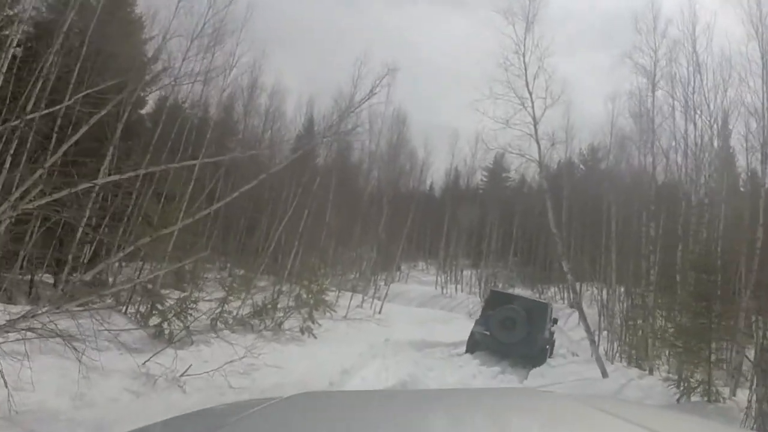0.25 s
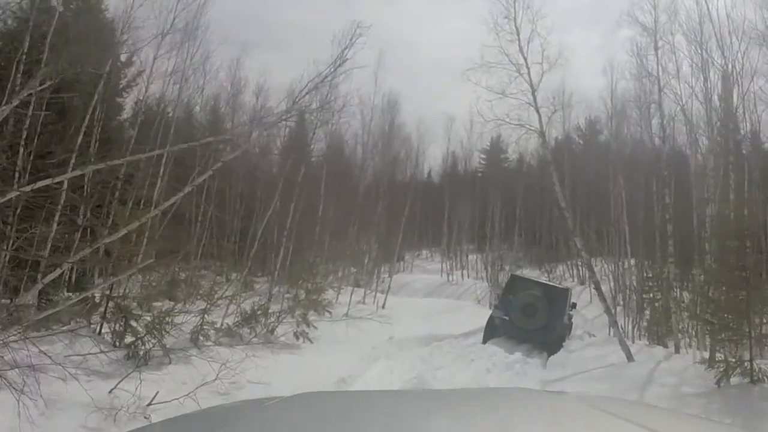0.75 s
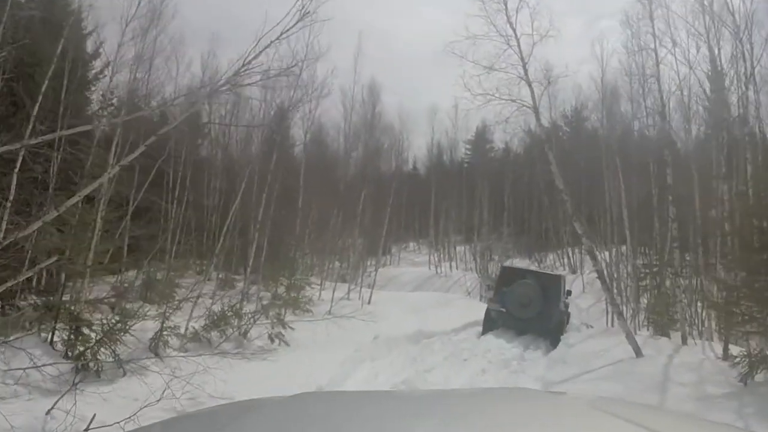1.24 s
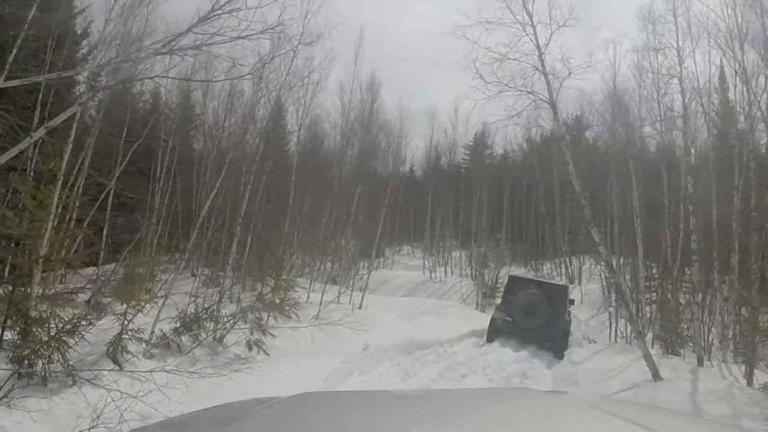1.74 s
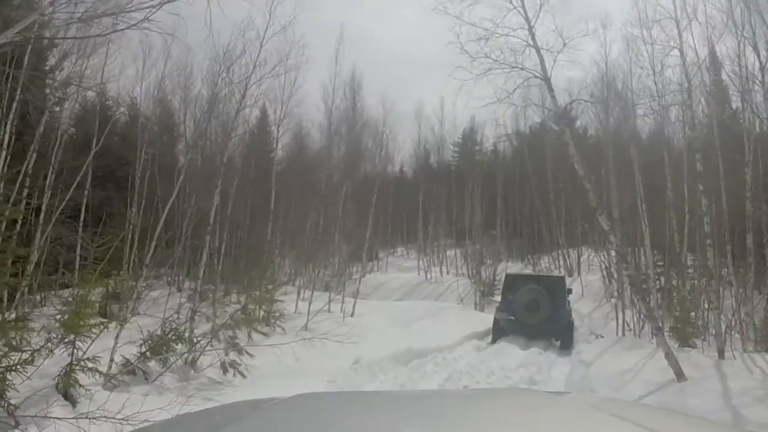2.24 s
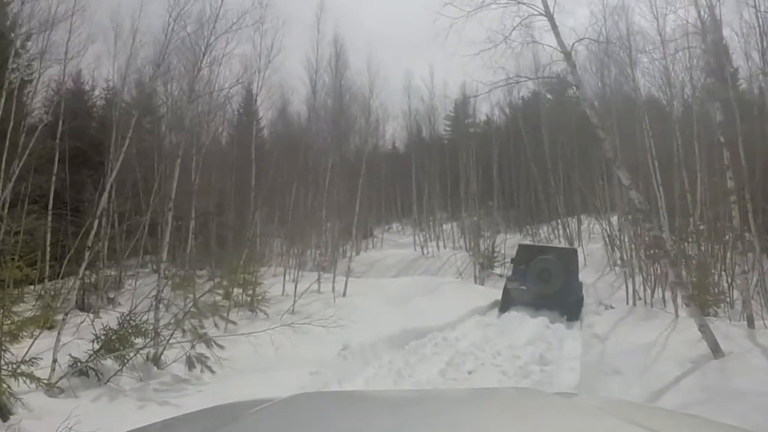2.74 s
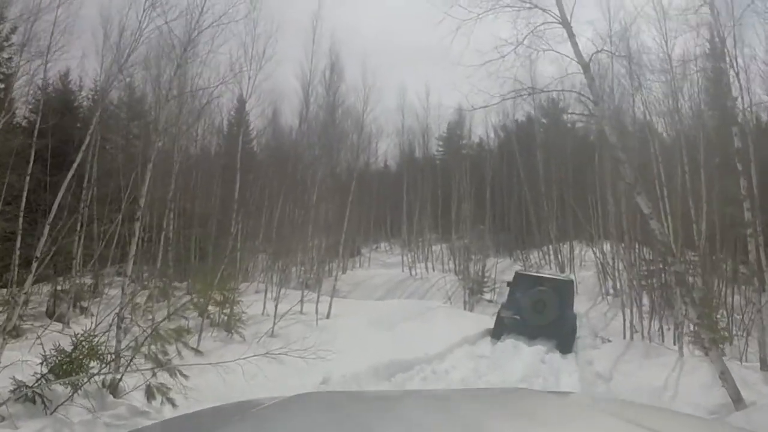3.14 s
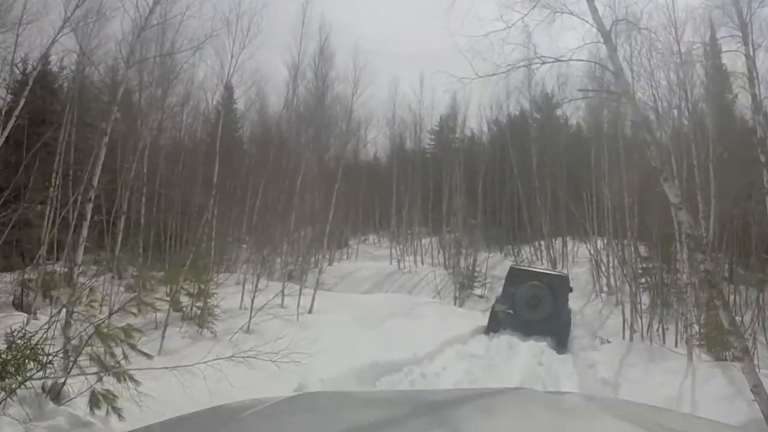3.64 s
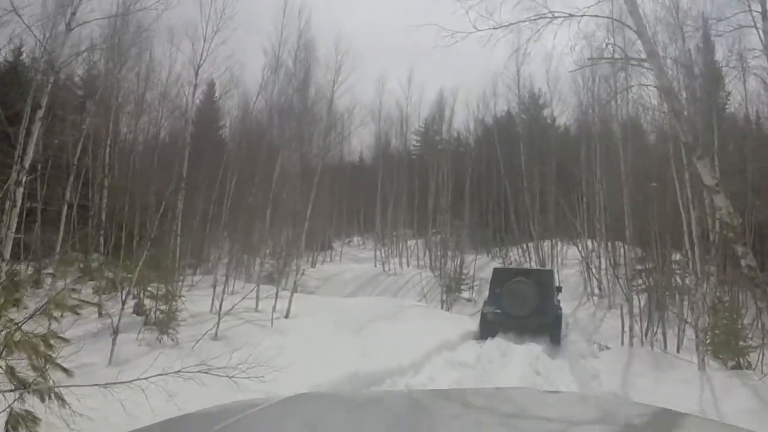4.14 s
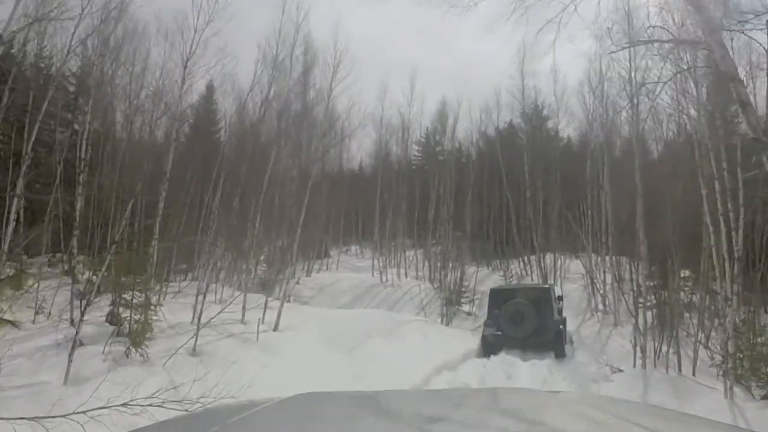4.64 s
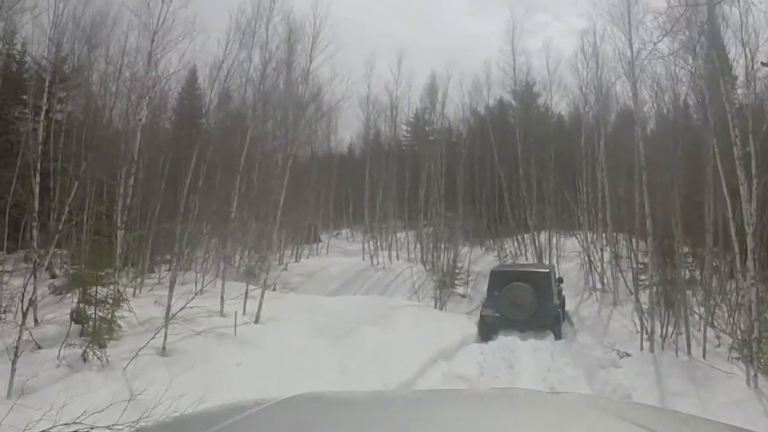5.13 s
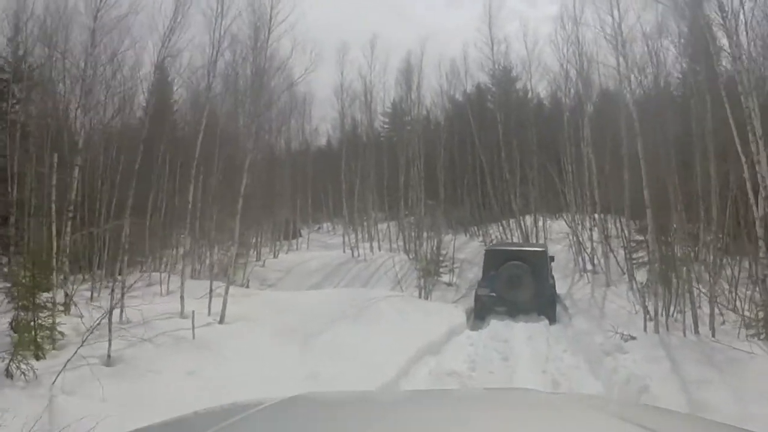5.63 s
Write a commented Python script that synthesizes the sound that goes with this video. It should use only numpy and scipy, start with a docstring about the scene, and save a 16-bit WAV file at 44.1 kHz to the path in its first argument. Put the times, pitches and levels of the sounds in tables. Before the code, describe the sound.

A bass-heavy mono cab recording: the engine labours at low revs, its boom swelling and fading, dipping in pitch near five seconds and then picking up. The vehicle lurches over snowy ruts with subsonic-like shudders, soft hollow knocks and light plastic ticks. Snow packs and crunches under the tyres, muffled by the body, and faint twig swishes pass outside. Nobody speaks; the motion continues from start to end.

```python
"""In the cab of a four-wheel-drive crawling along a track in deep snow. The engine drones at low revs as
harmonics of its firing rate; the body shudders in low spring resonances. The tyres rumble and crunch as shaped
noise and grains; ruts thump the chassis into short damped rings. Loose trim ticks and the hardest knocks crack
in brief noise bursts, and twigs swish along the paintwork as high friction noise."""
import sys
import numpy as np
from scipy import signal
from scipy.io import wavfile
from scipy.ndimage import uniform_filter1d

SR = 44100
rng = np.random.default_rng(int(sys.argv[2]) if len(sys.argv) > 2 else 0)


def unload_audio(sound):
    """Save the sound as a 16-bit wav file, at the path given as the first command line argument."""
    columns = np.transpose(np.atleast_2d(sound))
    # keep every value between -1 and 1, then stretch to whole-number steps
    steps = np.round(np.clip(columns, -1, 1) * 32767)
    wavfile.write(sys.argv[1], SR, steps.astype(np.int16))


N = 259308

# Twigs sliding along the body. Each row: time of fullest contact in seconds, level in dB before the
# common lift, rise in seconds, fall in seconds, lower frequency limit in Hz.
TWIG_CONTACTS = [(0.695, -71, 0.03, 0.06, 3500), (0.79, -62.5, 0.063, 0.076, 3000),
                 (0.94, -73.5, .06, 0.11, 4500), (2.725, -69, .02, 0.022, 8000),
                 (3.08, -76, .05, .05, 2500), (3.66, -70.5, 0.13, 0.08, 8000),
                 (4.92, -72, .02, 0.022, 9000), (5.05, -69, 0.027, .06, 10000),
                 (5.215, -61.5, 0.036, 0.069, 6300), (5.5, -68, 0.095, 0.13, 8000),
                 (5.73, -75, 0.13, 0.19, 6000)]
TWIG_LIFT_DB = 6.5

# The more distinct ticks: loose trim, and the sharp contact cracks of the rut knocks near 3.62, 3.94 and 4.23
# s. # Each row: time in seconds, chatter level in dB, chatter centre in Hz, snap level in dB before the common
# trim.
TICKS = [(.0645, -53, 2300, -82), (.304, -52, 3000, -62), (.3675, -54.5, 2400, -74),
         (.680, -56, 3000, -68), (1.004, -53.5, 1800, -76), (1.361, -57.5, 2500, -76),
         (1.6835, -57, 2500, -76), (2.058, -48.5, 2600, -56), (2.2937, -56.5, 3200, -68),
         (2.526, -58, 4000, -57), (2.546, -60, 4000, -56), (2.7217, -52, 2600, -44),
         (2.850, -53, 2400, -68), (2.866, -57, 3200, -65), (3.125, -50.5, 1900, -78),
         (3.1562, -52.5, 2300, -72), (3.412, -61, 3500, -63), (3.6215, -51.5, 2100, -72),
         (3.680, -60, 3000, -57), (3.7912, -57, 2400, -80), (3.921, -52.5, 2400, -82),
         (3.9375, -46, 1300, -80), (3.978, -53.5, 2700, -72), (4.2315, -50, 2000, -79),
         (4.4667, -53.5, 2300, -76), (4.5745, -54.5, 3000, -59), (5.3535, -51, 2800, -62),
         (5.6983, -54, 2800, -76), (5.7785, -57, 3200, -51.5)]
FAINT_TICK_DB, FAINT_SNAP_DB = -68, -76  # ticks at random times; same meaning as the columns above
SNAP_TRIM_DB = -0.5
TRIM_OCTAVES, TRIM_T60_S, TRIM_SWELL_S = 0.52, 0.043, 0.000395  # bandwidth, decay, onset
SNAP_T60_S = 0.016

# Chassis knocks. Each row: start in seconds, peak of the body's ring in dB, its pitch in Hz, its nominal
# decay time in seconds (shortened by RING_SHARE), panel clatter in dB, brightness limit of the contact in Hz.
RUT_KNOCKS = [(.478, -26, 118, 0.2, -51, 400), (1.178, -26.5, 234.6, 0.13, -47, 400),
              (1.187, -25, 225, .1, -37, 1800), (1.201, -28.5, 317, .06, -45, 600),
              (1.472, -29, 254, 0.12, -43.5, 500), (2.069, -20, 250, 0.052, -42, 800),
              (2.086, -30, 360, 0.049, -48, 600), (2.366, -25, 80, 0.11, -49, 400),
              (2.640, -31, 418, 0.084, -43, 700), (2.736, -28, 215, 0.16, -50, 400),
              (2.760, -21.5, 72, .14, -48, 400), (2.866, -24.5, 232, 0.093, -45, 400),
              (2.902, -24, 215, 0.091, -37.5, 1800), (3.155, -25.5, 211, 0.18, -50, 500),
              (3.466, -31.5, 339, 0.14, -49, 500), (3.624, -31, 564, 0.026, -36.5, 2500),
              (3.657, -35, 527, 0.035, -44, 1500), (3.765, -21, 89, .14, -53, 400),
              (3.939, -21, 312, 0.072, -40, 2200), (3.941, -31.5, 880, 0.074, -51, 2200),
              (3.950, -21.5, 230, 0.11, -46, 900), (3.956, -25.5, 378, 0.08, -49, 600),
              (3.985, -26.5, 208, 0.079, -48, 500), (4.160, -24.5, 207.5, 0.1, -46, 400),
              (4.235, -24.5, 219, 0.058, -36, 1500), (4.438, -28.5, 264, 0.045, -38.5, 800),
              (4.628, -28.5, 398, 0.1, -43, 500), (4.842, -30.5, 352, 0.12, -47, 600),
              (5.290, -35, 344, 0.036, -38, 1800), (5.322, -17.5, 269, 0.027, -39.5, 500),
              (5.405, -28.5, 127, 0.17, -58, 400), (5.526, -20.5, 121.5, 0.14, -55, 500),
              (5.640, -23, 210.3, 0.26, -43, 400), (5.671, -27, 330, .05, -41, 500),
              (5.693, -30, 504, 0.074, -41, 1600), (5.802, -22.5, 122.5, 0.18, -39, 700)]
RING_SHARE = 0.21  # share of the nominal decay given to each of two cascaded rings
# Cluster of body modes. Each row: multiple of the knock's pitch, relative level in dB.
BODY_MODES = [(.58, -5.5), (1, 3), (1.36, -11.5), (1.85, -14.5)]
# Modes of chassis, cab air and panels. Each row: frequency in Hz, relative level in dB,
# decay time to -60 dB in seconds at unit damping.
PANEL_MODES = [(122.8, 1.5, 0.25), (203.2, 0.5, 0.87), (230.4, -4.5, 0.34), (264, -4, 0.28),
               (315.5, -2.5, 0.12), (347.9, -2.5, 0.28), (410.3, -3.5, 0.28), (502, -8, 0.11),
               (553, -5, 0.13), (646, -19.5, 0.017), (774, -12, 0.09), (891, -12.5, 0.15),
               (1056, -13, 0.097)]

# Ride over the crust. Each row: time in seconds, rustle level in dB.
CRUST_RUSTLE = [(0, -55), (0.24, -58), (0.5, -58), (0.8, -58), (1.5, -56.5), (1.92, -58.5), (2.4, -58.0),
                (2.56, -58.5), (2.8, -56), (3.16, -56.5), (3.45, -58.5), (3.85, -58.5), (4.25, -57),
                (4.55, -57.0), (4.8, -59.5), (5.15, -58.5), (5.52, -56.5), (5.88, -54.5)]
# How heavily the tyres pack the snow, heard as cab rumble. Each row: time in seconds, level in dB.
SNOW_PACKING = [(0, -28), (.12, -28.5), (.22, -39), (.38, -31.5), (.52, -28), (.62, -33.5), (.92, -31),
                (1.15, -33.5), (1.32, -29), (1.65, -28.5), (1.95, -33), (2.12, -32), (2.4, -31),
                (2.55, -31.5), (2.75, -28), (2.88, -30), (3.02, -31), (3.3, -31), (3.48, -33.5),
                (3.62, -30.5), (3.85, -35.5), (3.97, -28), (4.12, -31.5), (4.27, -28.5), (4.55, -37.5),
                (4.82, -30), (4.95, -35.5), (5.06, -29.5), (5.2, -37), (5.35, -30.5), (5.55, -30),
                (5.88, -33)]
# Bumpiness of the track. Each row: time in seconds, panel shake relative to the direct crunch in dB.
TRACK_BUMPINESS = [(0, -6.5), (.5, 2), (1.0, -0.5), (1.3, -1.5), (1.8, 0), (2.1, -3), (2.5, -3), (2.9, 1.5),
                   (3.3, -6), (3.8, -3), (4.2, 1), (4.7, 0), (5.1, -10), (5.4, 1.5), (5.85, -3.5)]
# Noise spectra of rumble, crunch, rustle, hiss and twigs.
# Each row: frequency in Hz, relative power density in dB per Hz.
RUMBLE_SPECTRUM = [(30, -17), (42, -3), (60, -0.5), (76, 1.5), (95, -13.5), (125, -4.5), (160, -23),
                   (230, -24.5), (400, -40.5)]
CRUNCH_SPECTRUM = [(165, 2.5), (215, -3.5), (260, -1), (340, -4.5), (430, -5.5), (540, -12), (690, -13.5),
                   (850, -16.5), (1100, -17), (1500, -26.5), (2500, -31)]
RUSTLE_SPECTRUM = [(900, -1.5), (1500, -3), (2000, 0.5), (2600, -4.5), (3300, -5), (4200, -16), (5400, -18),
                   (6500, -20), (9000, -25), (13000, -38)]
HISS_SPECTRUM = [(3500, 5.5), (5500, -3), (7000, -3), (9000, -6.5), (11500, -8), (15000, -18)]
TWIG_SPECTRUM = [(2500, -2), (4700, 5.5), (7000, -1), (10000, -3), (13000, -2.5), (15000, 0)]
CRUNCH_DB, CRUNCH_FOLLOWS = -41, 0.76  # direct crunch's mean level; share of the rustle's swing it follows
RUMBLE_SWING_DB, CRUNCH_SWING_DB, RUSTLE_SWING_DB = 0.8, 0.5, 0.5
DEEP_EDGE_HZ, UPPER_FOLLOWS = 107, 0.47  # above the edge the rumble follows only a share of its swells

# Suspension and engine mounts. Each row: frequency in Hz, width of one resonance in Hz, relative level in dB.
SPRINGS = [(21.18, 3.24, -5.5), (30.44, 3.75, 0)]
# The body lurches over ruts. Each row: time in seconds, shudder level in dB, half length in seconds.
LURCHES = [(0.36, -17.5, 0.044), (0.555, -23.5, 0.026), (0.716, -21, 0.055), (.87, -21.5, 0.063),
           (1.116, -23.5, 0.037), (1.43, -16.5, 0.057), (1.528, -15, 0.042), (1.658, -18, 0.051),
           (1.773, -22, 0.077), (1.956, -24.5, 0.085), (2.17, -16.5, 0.034), (2.254, -19, 0.058),
           (2.346, -16.5, 0.034), (2.486, -20.5, 0.045), (2.605, -19, 0.025), (2.82, -17, 0.081),
           (2.963, -12.5, 0.032), (3.072, -16, 0.061), (3.235, -23.5, 0.053), (3.34, -23, 0.044),
           (3.628, -15, 0.028), (3.885, -16.5, 0.079), (4.046, -16.5, 0.047), (4.234, -14.5, 0.019),
           (4.409, -22, 0.064), (5.04, -21.5, 0.018), (5.367, -15.5, 0.044), (5.737, -17.5, 0.093)]
SWAY_DB, SWAY_FLUTTER_DB, SWAY_FLUTTER_HZ = -26, 2.5, 15  # shudder between lurches; unevenness overall
SWING_LIMIT = 0.68  # amplitude at which the springs' swing saturates

# Engine speed. Each row: time in seconds, firings per second.
FIRING_RATE = [(0.0, 56.7), (0.42, 58.8), (0.84, 55.9), (1.17, 56.5), (1.54, 53.5), (2.0, 52.9),
               (2.36, 55.2), (2.62, 54.4), (2.94, 55.9), (3.3, 52.7), (3.72, 49.8), (4.06, 53.0),
               (4.36, 54.7), (4.62, 53.6), (5.04, 48.2), (5.2, 48.0), (5.6, 54.4), (5.88, 56.5)]
WAVER, WAVER_HZ = 0.003, 7  # uneven running: spread as a share of the speed, and its rate
# Engine load, heard as exhaust boom at the firing rate. Each row: time in seconds, level in dB.
EXHAUST_BOOM = [(0.0, -21), (0.25, -34.5), (0.55, -25), (0.7, -32.5), (0.92, -21), (1.2, -23.5),
                (1.36, -26.5), (1.55, -25.5), (1.75, -29), (2.35, -25.5), (2.75, -28), (3.15, -27),
                (3.35, -33.5), (4.08, -34), (4.22, -22.5), (4.48, -26.5), (4.72, -36.5), (4.96, -34),
                (5.05, -22.5), (5.16, -34), (5.58, -38), (5.88, -23.5)]
# How hard the engine drives the cab's air. Each row: time in seconds, drive in dB.
DRONE_DRIVE = [(0, 3), (.3, -0.5), (.5, -2.5), (.8, -2.5), (1.1, -4.5), (1.22, 1.5), (1.6, -2.5), (2.0, -2),
               (2.15, -1.5), (2.35, -4.5), (2.68, -3), (2.85, -2.5), (3.0, -4.5), (3.15, -2), (3.35, -2),
               (3.5, -1.5), (3.72, 2.5), (3.85, -7.5), (4.1, 1), (4.3, -6), (4.62, 1), (4.85, -4.5),
               (5.35, -7), (5.55, -2.5), (5.88, -3)]
# The cab's air resonance: centre, full width between -6 dB points, drone level on it at 0 dB drive.
CAB_HZ, CAB_WIDTH_HZ, DRONE_DB = 160.97, 16.5, -33.2
# Weaker engine harmonics. Each row: multiple of the firing rate, mean level in dB.
OVERTONES = [(2, -47.5), (4, -53), (5, -54), (6, -55), (7, -57.5)]
# Resonances of cab, engine bay and dashboard. Each row: frequency in Hz, width of one resonance in Hz,
# level in dB.
WHIRR = [(206.7, 53, -51), (1991, 48, -70.5), (3360, 510, -77.5), (4750, 640, -77), (5500, 520, -79.5)]

CUTOFF_HZ = 15200


def from_db(db):
    """Level law: decibels to amplitude gain."""
    return 10 ** (np.asarray(db) / 20)


def rms_one(x):
    """Normalisation: scale a signal to unit mean power."""
    return x / np.sqrt(np.mean(x ** 2) + 1e-20)


def in_time(rows):
    """Linear interpolation: each column of a time table, per sample."""
    seconds, *columns = np.transpose(rows)
    return [np.interp(np.arange(N) / SR, seconds, column) for column in columns]


def filtered(x, hz, kind, order=2):
    """Linear filtering with a maximally flat (Butterworth) passband."""
    sections = signal.butter(order, np.clip(hz, 8, 0.48 * SR), kind, fs=SR, output="sos")
    return signal.sosfilt(sections, x + 1e-18)


def drift(rate_hz):
    """Slow random modulation: white noise through two equal low-pass poles, spread 1."""
    step = 40  # samples between computed points
    pole = np.exp(-2 * np.pi * rate_hz * step / SR)
    white = rng.standard_normal(N // step + 2002)
    slow = signal.lfilter([1], [1, -2 * pole, pole * pole], white)[2000:]
    return np.interp(np.arange(N) / step, np.arange(len(slow)), rms_one(slow))


def ring(force, hz, t60):
    """Damped oscillation: a unit click excites a decaying sine of initial height 1."""
    radius = np.exp(-np.log(1000) / (t60 * SR))
    angle = 2 * np.pi * hz / SR
    return signal.lfilter([0, np.sin(angle)], [1, -2 * radius * np.cos(angle), radius ** 2], force + 1e-18)


def resonant_noise(hz, width_hz):
    """Resonance under random forcing: noise twice through one mode, already running at the start."""
    t60 = np.log(1000) / (np.pi * width_hz)
    once = ring(rng.standard_normal(N + SR), hz, t60)
    return rms_one(ring(once, hz, t60)[SR:])


def grains(per_s, spread_db):
    """Random impulse process: clicks of uneven size and either sign, unit power."""
    sizes = from_db(spread_db * np.minimum(rng.exponential(1, N), 4))
    signs = rng.choice([-1, 1], N)
    return rms_one(sizes * signs * (rng.random(N) < per_s / SR))


def coloured(spectrum, patchy_db, grain=0, per_s=500):
    """Band synthesis: third-octave noise and grains flicker partly together, partly alone; unit power."""
    hz, level_db = np.transpose(spectrum)
    edges = np.geomspace(hz[0], hz[-1], round(3 * np.log2(hz[-1] / hz[0])) + 1)
    # neighbouring bands take alternate, independent sources
    sources = [rng.standard_normal(N) + grain * grains(per_s, spread_db=2.5) for _ in range(2)]
    out, together = 0, drift(38)
    for k, band in enumerate(zip(edges, edges[1:])):
        band_db = np.interp(np.mean(np.log(band)), np.log(hz), level_db)
        flicker_db = patchy_db * (0.74 * together + drift(11.2))
        out = out + from_db(band_db + flicker_db) * filtered(sources[k % 2], band, "band")
    return rms_one(out)


def burst(s, t60, swell_s):
    """Transient noise: a clatter swells exponentially up to s and decays; unit energy."""
    out = np.zeros(N)
    first, last = max(int((s - 3 * swell_s) * SR), 0), min(int((s + t60) * SR) + 2, N)
    at = np.arange(first, last)
    age = at / SR - s
    envelope = np.exp(np.minimum(age / swell_s, -np.log(1000) * age / t60))
    noise = rng.standard_normal(len(at)) * envelope
    out[at] = noise / np.linalg.norm(noise)
    return out


def panels(force, damping=1):
    """Modal superposition: a force rings every panel mode at its set share, with alternating sign."""
    out = 0
    for k, (hz, db, t60) in enumerate(PANEL_MODES):
        out = out + (-1) ** k * from_db(db) * rms_one(ring(force, hz, t60 / damping))
    return out


def twigs():
    """Friction noise: twigs and their snow slide over the body, each swish following its contact."""
    friction, out = coloured(TWIG_SPECTRUM, patchy_db=1.3, grain=0.67, per_s=630), 0
    for s, db, rise_s, fall_s, low_hz in TWIG_CONTACTS:
        age = np.arange(N) / SR - s
        contact = np.exp(-np.abs(age / np.where(age < 0, rise_s, fall_s)) ** 1.35)
        out = out + from_db(db + TWIG_LIFT_DB) * contact * filtered(friction, low_hz, "high")
    return out


def ticks():
    """Impact excitation: loose trim, or a knock's hard contact, chatters in its own broad band, with a bright
    snap from the contact."""
    out = np.zeros(N)
    chance = rng.uniform([0, 1800], [N / SR - 0.05, 3300], size=(24, 2))
    faint = [(s, FAINT_TICK_DB, hz, FAINT_SNAP_DB) for s, hz in chance]
    for s, db, hz, snap_db in list(TICKS) + faint:
        touch = burst(s, t60=TRIM_T60_S, swell_s=TRIM_SWELL_S)
        band = hz * 2 ** (TRIM_OCTAVES * np.array([-0.5, 0.5]))
        chatter = filtered(filtered(touch, band, "band", order=1), 5200, "low", order=3)
        loudest = np.sqrt(uniform_filter1d(chatter ** 2, size=SR // 100).max())  # over 10 ms
        snap = filtered(burst(s, t60=SNAP_T60_S, swell_s=TRIM_SWELL_S), [6500, 15000], "band")
        out += from_db(db) * chatter / loudest
        out += from_db(snap_db + SNAP_TRIM_DB) * snap / np.abs(snap).max()
    return out


def thumps():
    """Impulse response: the suspension takes a rut, the push rings one spot of the body, panels clatter."""
    out = np.zeros(N)
    push = signal.unit_impulse(SR // 2)
    chatter_decay = np.exp(-np.arange(len(push)) / (0.0059 * SR))
    for s, db, hz, t60, clatter_db, bright_hz in RUT_KNOCKS:
        body = 0
        for multiple, mode_db in BODY_MODES:
            once = ring(push, multiple * hz, t60 * RING_SHARE)
            body = body + from_db(mode_db) * rms_one(ring(once, multiple * hz, t60 * RING_SHARE))
        chatter = rms_one(rng.standard_normal(len(push)) * chatter_decay) / np.sqrt(len(push))
        clatter = filtered(panels(push + 0.5 * chatter, damping=1.47), bright_hz, "low", order=1)
        clatter = filtered(clatter, 250, "high", order=1)
        # loudest 20 ms
        loudest = np.sqrt(uniform_filter1d(clatter ** 2, size=SR // 50, mode="constant").max())
        knock = from_db(db) * body / np.abs(body).max() + from_db(clatter_db) * clatter / loudest
        start = int(s * SR)
        out[start:start + len(knock)] += knock[:N - start]
    return out


def rumble(level_db):
    """Frequency-dependent swell: soft ground swells the tyres' deep rumble more than its upper part."""
    swing_db = level_db - level_db.mean() + RUMBLE_SWING_DB * drift(12.0)
    noise = coloured(RUMBLE_SPECTRUM, patchy_db=-0.37)
    deep = filtered(noise, DEEP_EDGE_HZ, "low", order=3)
    upper = filtered(noise, DEEP_EDGE_HZ, "high", order=3)
    return from_db(level_db.mean()) * (from_db(swing_db) * deep + from_db(UPPER_FOLLOWS * swing_db) * upper)


def snow(rumble_db, rustle_db, shake_db):
    """Granular fracture: packed snow rumbles, crunches and shakes the panels; crust rustles over soft hiss."""
    crunch_db = CRUNCH_DB + CRUNCH_FOLLOWS * (rustle_db - rustle_db.mean())
    lumps = drift(15.0)
    direct = coloured(CRUNCH_SPECTRUM, patchy_db=1.38, grain=0.88, per_s=200)
    panel_ring = filtered(panels(grains(per_s=450, spread_db=3.0)), 570, "low", order=1)
    shaken = from_db(shake_db) * rms_one(panel_ring)
    crunch = from_db(crunch_db + CRUNCH_SWING_DB * lumps) * (direct + shaken)
    crust = coloured(RUSTLE_SPECTRUM, patchy_db=1.46, grain=0.71, per_s=320)
    rustle = from_db(rustle_db + RUSTLE_SWING_DB * lumps) * crust
    hiss = from_db(-70.0) * coloured(HISS_SPECTRUM, patchy_db=-1.0)
    return rumble(rumble_db) + crunch + rustle + hiss


def rocking_db():
    """Power addition: a steady sway plus a bell-shaped swell for each lurch, with a random flutter."""
    t = np.arange(N) / SR
    power = from_db(SWAY_DB) ** 2
    for s, db, half_s in LURCHES:
        power = power + (from_db(db) * np.exp(-((t - s) / half_s) ** 2 / 2)) ** 2
    return 10 * np.log10(power) + SWAY_FLUTTER_DB * drift(SWAY_FLUTTER_HZ)


def shudder(level_db):
    """Saturating resonance: the body rocks on its springs, whose largest swings are rounded off."""
    sway = sum(from_db(db) * resonant_noise(hz, width_hz) for hz, width_hz, db in SPRINGS)
    even = sway / (np.abs(signal.hilbert(sway)) + 0.3)  # levels out the random envelope
    swing = from_db(level_db) * rms_one(even)
    return filtered(SWING_LIMIT * np.tanh(swing / SWING_LIMIT), 42.5, "low", order=4)


def cab_drone_db(firing_hz):
    """Forced resonance: the drone swells with drive and as the third harmonic nears the cab's resonance."""
    detuning = (3 * firing_hz - CAB_HZ) / (CAB_WIDTH_HZ / 2)
    drive_db, = in_time(DRONE_DRIVE)
    return DRONE_DB + drive_db - 20 * np.log10(1 + detuning ** 2)


def engine(firing_hz, boom_db, drone_db):
    """Harmonic series: firing-rate multiples boom and drone; cab, belts and gears whirr faintly."""
    turn = 2 * np.pi * np.cumsum(firing_hz) / SR
    boom = from_db(boom_db + 0.65 * drift(6.1)) * np.sin(turn)
    third = np.sin(3 * turn + rng.uniform(0, 2 * np.pi))
    drone = from_db(drone_db + 0.5 * drift(8.5)) * third
    overtones = 0
    for multiple, db in OVERTONES:
        tone = np.sin(multiple * turn + rng.uniform(0, 2 * np.pi))
        overtones = overtones + from_db(db + 1.84 * drift(5.0)) * tone
    whirr = sum(from_db(db) * resonant_noise(hz, width_hz) for hz, width_hz, db in WHIRR)
    return np.sqrt(2) * (boom + drone + overtones) + whirr  # root 2: sine levels are rms


def scene():
    """Superposition: everything that reaches the cab adds up in one channel."""
    surroundings = twigs() + ticks() + thumps()
    ground = snow(*in_time(SNOW_PACKING), *in_time(CRUST_RUSTLE), *in_time(TRACK_BUMPINESS))
    body = shudder(rocking_db())
    firing_hz, = in_time(FIRING_RATE)
    wavering_hz = firing_hz * (1 + WAVER * drift(WAVER_HZ))
    motor = engine(wavering_hz, *in_time(EXHAUST_BOOM), cab_drone_db(firing_hz))
    return (surroundings + ground + body + motor)[None]


def record(dry):
    """Band limiting and saturation: subsonic sway is dropped, large swings are rounded, the top is cut."""
    heard = filtered(dry, 11, "high")
    rounded = heard / (1 + (heard / 0.5) ** 8) ** (1 / 8)
    steep_cut = signal.ellip(10, 0.1, 80, CUTOFF_HZ, fs=SR, output="sos")
    return signal.sosfilt(steep_cut, rounded)


dry = scene()
out = record(dry)
unload_audio(out)
```